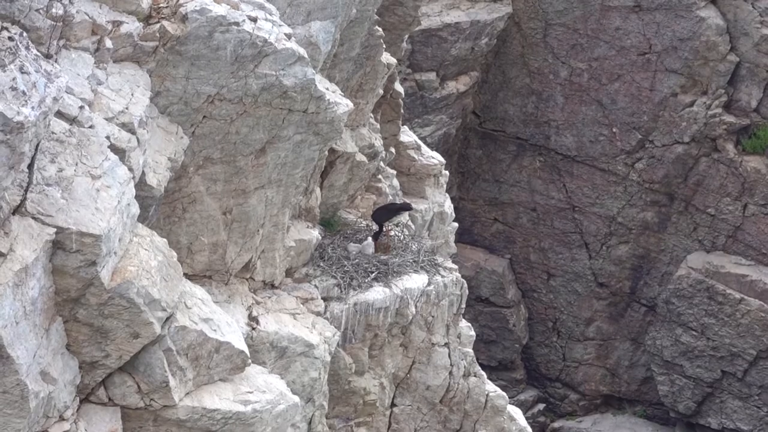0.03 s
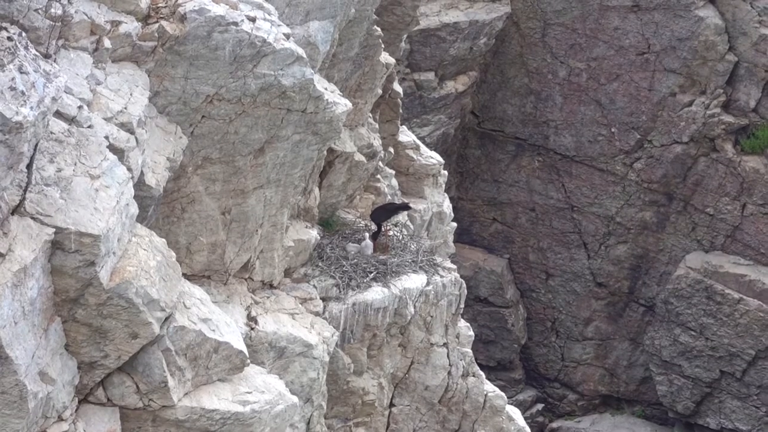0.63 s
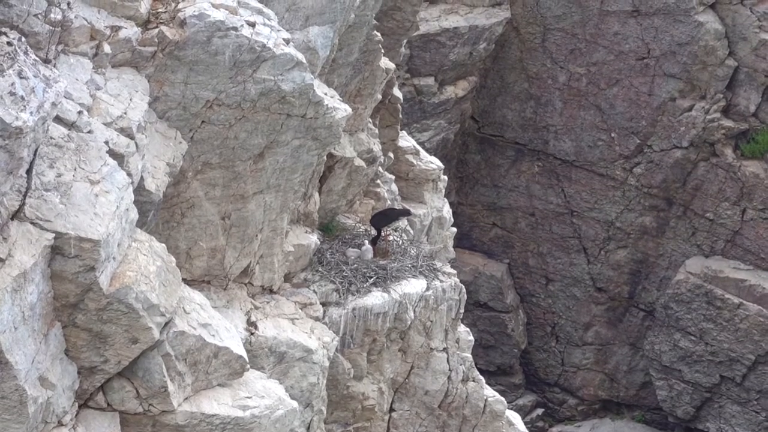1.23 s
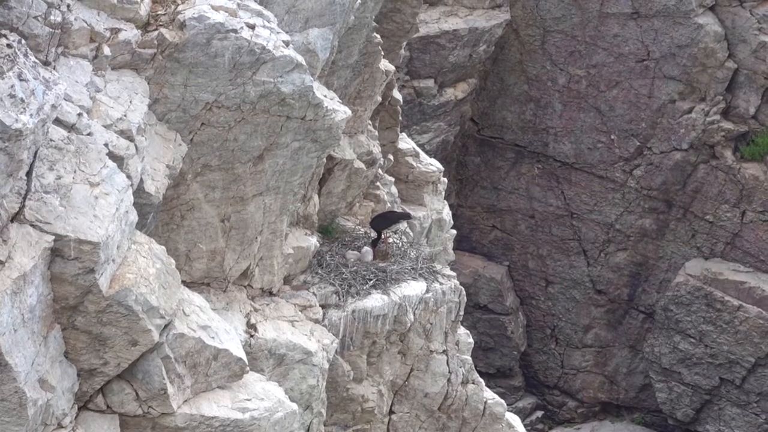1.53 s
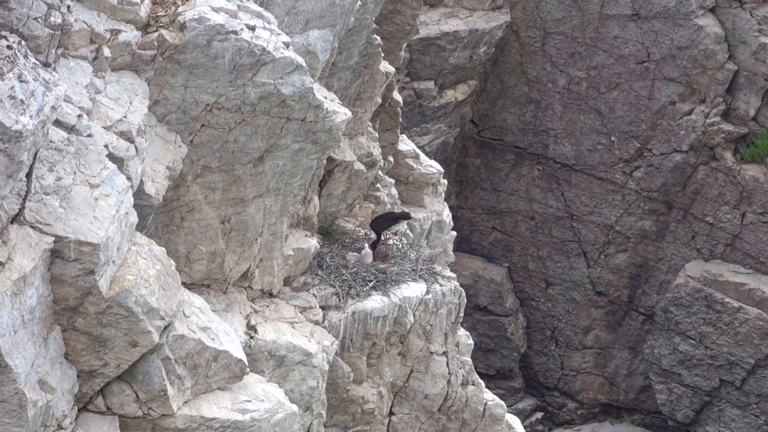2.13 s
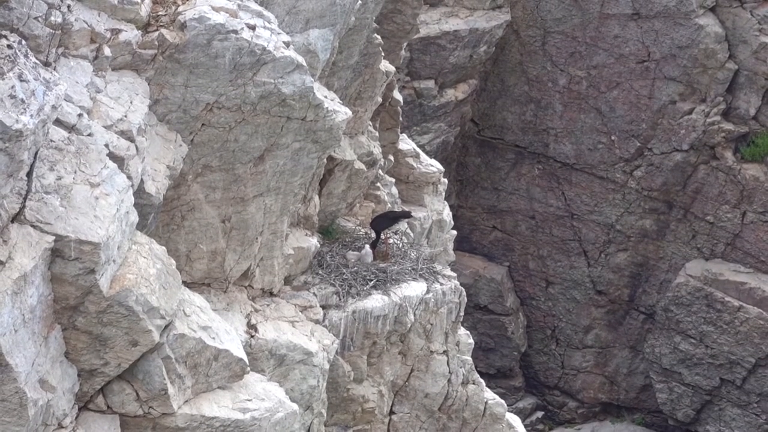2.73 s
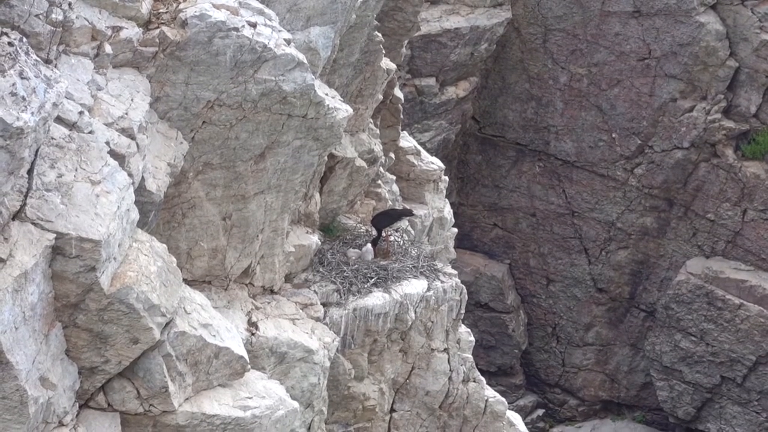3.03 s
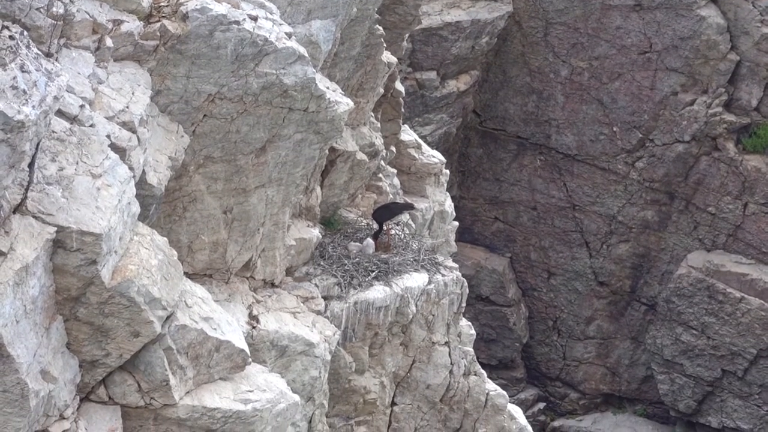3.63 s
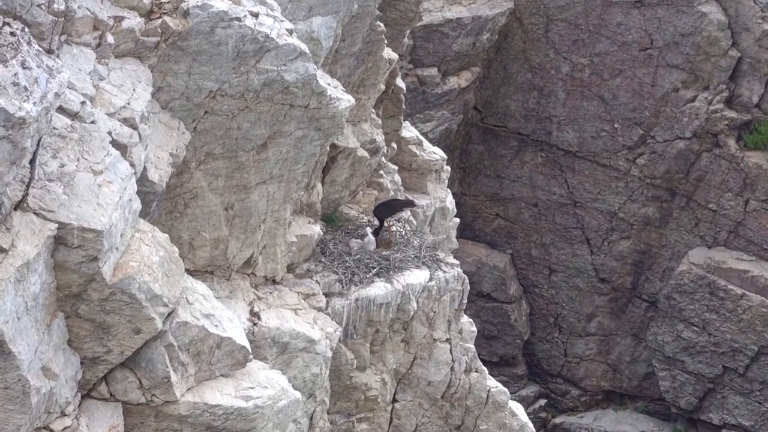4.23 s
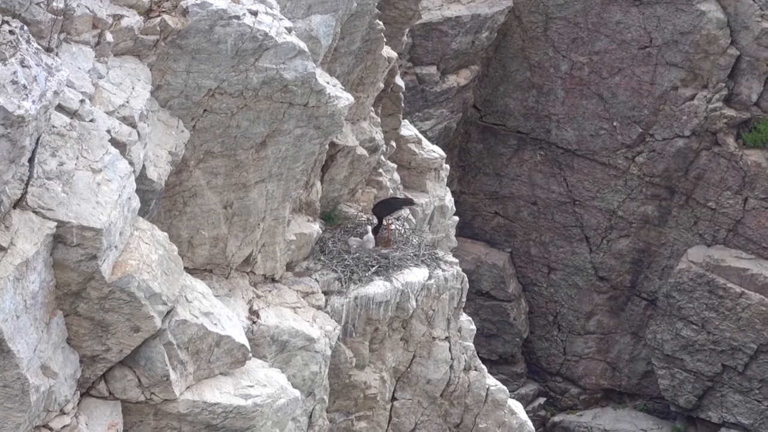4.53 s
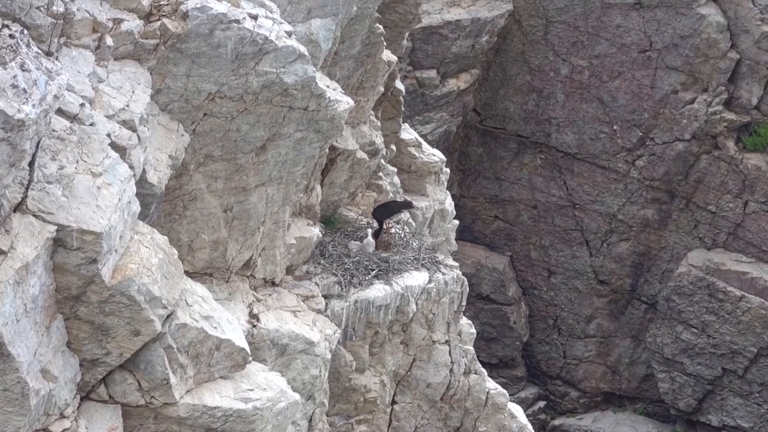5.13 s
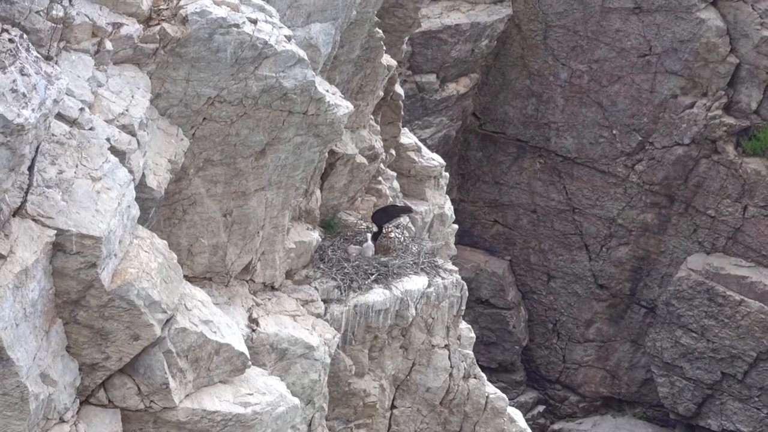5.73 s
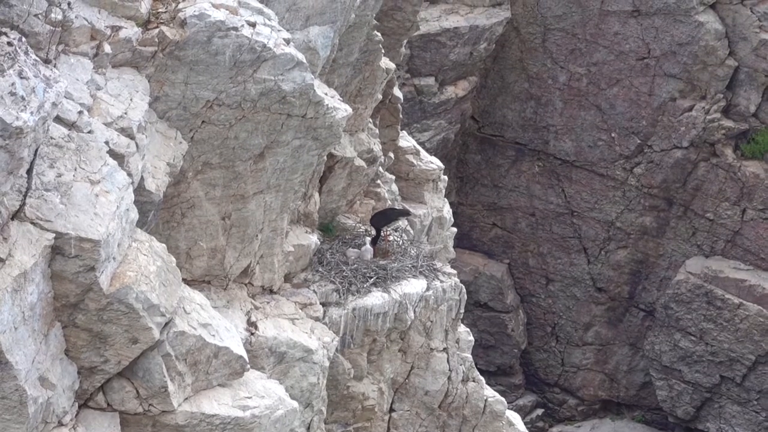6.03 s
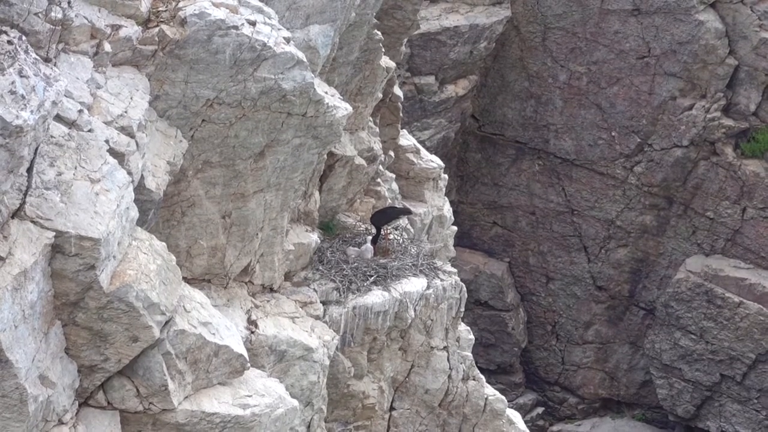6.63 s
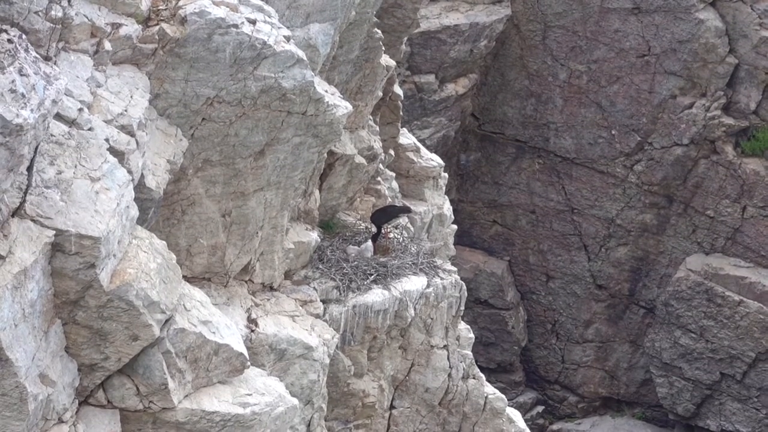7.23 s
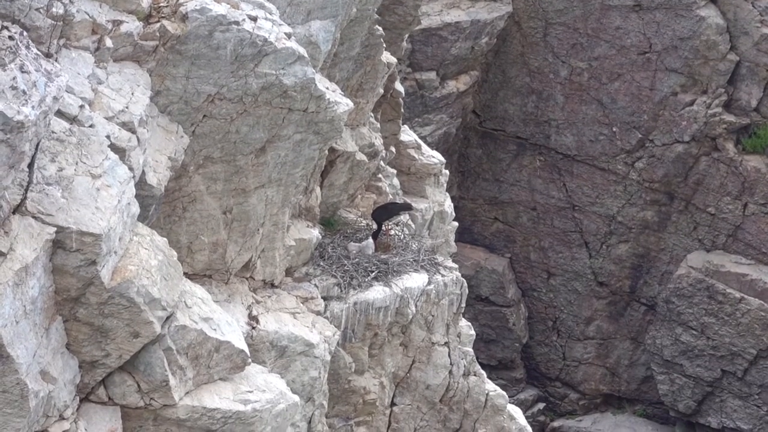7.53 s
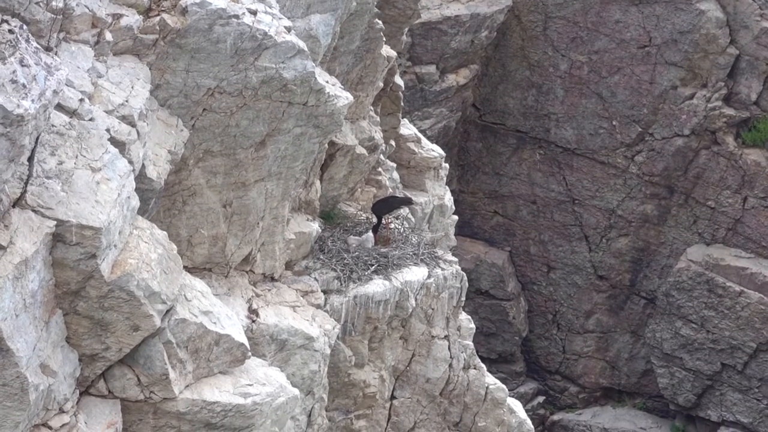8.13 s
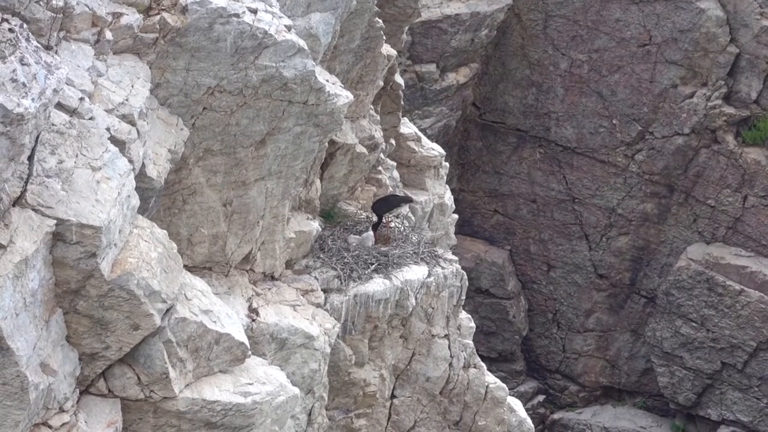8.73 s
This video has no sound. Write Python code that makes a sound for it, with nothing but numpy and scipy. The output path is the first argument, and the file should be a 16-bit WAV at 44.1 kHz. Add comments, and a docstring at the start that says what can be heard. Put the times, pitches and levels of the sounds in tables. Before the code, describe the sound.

Wind gusts rumble and thump on the microphone over distant surf, with faint bird chirps, far seabird cries and one sharp click.

```python
"""Wind on a camera microphone facing a rocky cliff; distant surf washes and hisses throughout.
0-1.3 s: the hardest gusts sweep eddies over both ports, mostly from the right, and drive the limiter.
Weaker gusts follow. Small birds chirp from 0.7 s, far seabirds call from 1.3 s; both echo off the rock.
Faint dry ticks start close by at 1.4 s. A touch rings the camera body at 5.1 s, a small hard part
snaps over with one sharp click at 6.2 s, and a second touch comes at 8.6 s."""
import sys
import numpy as np
from scipy import signal
from scipy.fft import rfft, irfft
from scipy.io import wavfile
from scipy.ndimage import uniform_filter1d, map_coordinates

SR = 44100
rng = np.random.default_rng(int(sys.argv[2]) if len(sys.argv) > 2 else 0)


def dump_mix(stems):
    """Bounce the given channels to the path in sys.argv[1] as a 16-bit WAV at rate SR."""
    frames = np.atleast_2d(stems).T  # one column per channel
    limited = np.clip(frames, -1, 1)  # hard clip at full scale
    pcm = np.round(limited * 32767).astype(np.int16)
    wavfile.write(sys.argv[1], SR, pcm)


N = 396018
T = np.arange(N) / SR

# surf spectra: f/Hz, relative level/dB
WASH_SPECTRUM = [(25, 8), (70, 12), (130, 5.5), (215, 6), (300, 3), (410, 0), (540, 0.5), (750, -3),
                 (920, -2), (1100, -6), (1400, -8.5), (1700, -18.5), (2600, -24.5), (6000, -45)]
SPLASH_SPECTRUM = [(700, -71), (1400, 2.5), (1850, 5), (2400, -1), (3000, -8), (4500, -16), (9000, -22)]
FOAM_SPECTRUM = [(1500, -4), (2800, -1), (4000, 1), (5200, -0.5), (6200, -3), (7500, -5), (8600, -2.5),
                 (9600, -2.5), (11300, -3.5), (13000, -4.5), (15500, -9)]
# surf at the two ports: f/Hz, coherence/1, left minus right/dB
SURF_STEREO = [(60.36, 1, 0.5), (496, 0.88, -1), (1240, 0.59, 1), (2400, 0.27, -4.5), (4100, 0.3, -9),
               (7200, 0.12, -5), (11100, 0.72, 0.5), (15000, 0.8, -3)]
# ebbing wash and foam: t/s, relative level/dB
WASH_ENVELOPE = [(0, -54.5), (.55, -54.5), (1.3, -57.5), (2.5, -57.5), (2.66, -54.5), (2.9, -57),
                 (3.8, -59), (5.5, -58.5), (6.2, -60), (7.5, -58.5), (8.1, -62), (8.7, -59.5),
                 (8.98, -60.5)]
FOAM_ENVELOPE = [(0, -56.5), (.55, -55), (1, -61.5), (1.7, -60.5), (3, -61.5), (4.3, -66), (6.5, -67.5),
                 (8.98, -69.5)]
# waves breaking on rock: t/s, hold/s, level/dB
BREAKING_WAVES = [(0, 1.52, -60), (1.7, 1.74, -63.5), (2.634, 0.088, -56), (3.351, 0.16, -63.5),
                  (5.4, 0.552, -65.5), (6.5, 1.11, -62.5), (8.679, 0.13, -65.5)]
# hollow rushes in the surf: t/s, hold/s, centre f/Hz, level/dB
HOLLOW_RUSHES = [(0, 3.34, 1145, -60), (.6, 2.2, 1908, -71.5), (5.2, 0.67, 1860, -67)]
WAVE_RISE_DB_PER_S = 54

# bird notes: t/s, length/s, start f/Hz, middle f/Hz, end f/Hz, relative level/dB, waver/Hz
SMALL_BIRD_CHIRPS = [ (.735, 0.072, 9100, 8350, 7050, -54, 170), (2.02, 0.078, 8920, 8085, 7046, -58, 130),
                     (5.265, 0.077, 8730, 7997, 7020, -67, 170.6),
                     (6.088, 0.055, 3194, 4020, 4570, -61, 45.1),
                     (6.368, 0.098, 4780, 4000, 3170, -58.5, 30.4),
                     (7.875, 0.078, 8870, 8235, 7320, -68, 170.9), ]
SEABIRD_CRIES = [ (1.31, 0.11, 1997, 2032, 1913, -61, 90.2), (3.32, 0.16, 2808, 2383, 1909, -62, 109.5),
                 (3.48, 0.13, 2143, 2286, 2184, -64, 90), (5.76, 0.053, 1803, 1732, 1671, -62, 30.1),
                 (5.79, 0.11, 1888, 2030, 1932, -64, 110.1), (7.31, .29, 2458, 2528, 2306, -64, 45),
                 (7.7, .12, 2147, 2330, 2464, -64, 90.24), (8.0, 0.2, 2218, 2537, 2494, -67.5, 65),
                 (8.275, 0.066, 947, 1040, 1028, -59, 69.9), (8.65, 0.11, 2450, 2540, 2314, -63.5, 100.2),
                 (8.7, 0.14, 2250, 2080, 1897, -59.5, 110.9), (8.745, 0.05, 850, 887, 901.5, -51, 90), ]

# dry ticks: t/s, level/dB
RUSTLE_TICKS = [(1.438, -58), (1.457, -56), (1.769, -56), (1.799, -58), (1.998, -59.5), (2.921, -60),
                (5.122, -63), (8.618, -61)]
# tick spectrum: f/Hz, relative level/dB
TICK_SPECTRUM = [(1500, -27), (3400, 4), (4200, -9), (5800, -1), (9000, -25)]
# touches on the camera body: t/s, relative level/dB
BODY_TOUCHES = [(5.121, -46.5), (8.586, -44)]
# body modes: f/Hz, relative level/dB, t60/s
BODY_MODES = [(570, 3, .025), (820, -5, .02), (1150, -10, .015)]
# contacts of the clicking part: t/s, relative level/dB
PART_CONTACTS = [(6.1809, -18.5), (6.1825, -25), (6.1827, -23.5)]
# its modes: f/Hz, relative level/dB, t60/s, left minus right/dB
PART_MODES = [(931, -23.5, 0.082, 5), (1218, -24, 0.013, 0), (1575, -18, 0.019, -8), (2046, -23, 0.03, -1),
              (2420, -14, 0.016, -2), (3024, -11.5, 0.0081, -7), (4400, -11.5, 0.0046, -4),
              (5710, -7.5, 0.0026, -14), (8740, -4.5, 0.0048, 0), (10230, -18, 0.005, 0),
              (11300, -12, 0.007, 1)]

# light air between gusts: t/s, level/dB
BREEZE_ENVELOPE = [(0, -45), (1.7, -46), (3.3, -46), (3.8, -52), (4.7, -46), (6.6, -58), (7.3, -51.5),
                   (8.98, -54)]
# gusts: t/s, hold/s, level/dB, left port lag/s (positive: from the right)
WIND_GUSTS = [(0, 0.053, -22, .0011), (0.099, 0.13, -32, .001), (0.421, 0.068, -22.5, .0011),
              (0.543, 0.07, -27, .001), (0.611, 0.28, -20, .0006), (0.936, 0.24, -23, .0007),
              (1.183, 0.071, -25, .001), (1.488, 0.089, -40, .001), (1.701, 0.12, -42, 0),
              (1.95, 0.044, -27.5, .0004), (2.02, 0.064, -33.5, -.0009), (2.363, 0.068, -27, .0008),
              (2.452, 0.087, -35, -.0002), (2.657, 0.18, -39, 0), (2.967, 0.04515, -27, .0009),
              (3.059, 0.043, -32, -.0007), (3.181, 0.085, -38.5, .0007), (3.346, 0.087, -23.5, -.0007),
              (3.51, 0.023, -30, -.0011), (3.613, 0.13, -43, 0), (3.981, .02, -35, .0008),
              (4.18, 0.23, -36, -.0003), (4.416, 0.16, -32.5, -.0008), (4.661, .17, -34.5, -.0003),
              (4.982, 0.082, -33, -.0008), (5.217, 0.033, -27, .001), (5.335, 0.024, -38, -.0002),
              (5.478, .025, -37, -.0002), (5.696, 0.21, -43.5, 0), (6.83, 0.023, -43, 0),
              (6.995, 0.0401, -27.5, .0008), (7.08, 0.08, -31, .001), (7.563, 0.052, -42, 0),
              (7.966, 0.12, -37.5, .0007), (8.649, 0.091, -34.5, .0009)]
# strongest eddies, slapping the ports: t/s, relative level/dB, core speed/air speed
EDDY_SLAPS = [(.008, -17, 0.96), (0.052, -16, 0.81), (0.189, -24, 1.48), (0.426, -16, 1.05),
              (.567, -21, 1.024), (0.59, -15.5, 0.92), (.619, -10.5, 1.58), (0.654, -13.5, 1.204),
              (0.668, -10.5, 1.33), (.692, -17, 1.76), (.707, -16.5, 1.63), (0.729, -10.5, 1.124),
              (0.767, -18.5, 1), (0.796, -23, 1.21), (0.82, -10, 1.196), (.838, -13.5, 1.3),
              (0.859, -15, 1.21), (.951, -9.5, 1.204), (.968, -13, 1.25), (1.017, -14, 1.24),
              (1.054, -17.5, 1.026), (1.108, -18, 1.1), (1.13, -14, 1.55), (1.157, -13.5, 1.31),
              (1.19, -19, 0.83), (1.22, -21, 1.2), (1.496, -29.5, 1.05), (1.957, -21, 1.07),
              (1.993, -19.5, 0.66), (2.348, -21.5, 1.4), (2.398, -25.5, 1.22), (2.421, -21.5, 1.3),
              (2.986, -24, 1.1), (3.357, -16.5, .82), (3.4, -17.5, 0.85), (3.434, -16.5, 0.79),
              (3.519, -22.5, 1.12), (4.197, -30, 1.23), (4.508, -23, 1.31), (4.812, -29, 1.16),
              (5.054, -25.5, 1.08), (5.232, -17.5, 0.73), (5.242, -17.5, 1.53), (6.988, -26.5, 1.17),
              (7.004, -19, 1.215), (7.021, -26, 1.22), (7.09, -26, 1.09), (7.99, -32, 1.25),
              (8.055, -30.5, 0.82), (8.655, -30, 0.85), (8.725, -30, 0.83)]
# eddy pressure spectrum at GUST_REF_DB: f/Hz, relative level/dB
EDDY_SPECTRUM = [(12, -33), (25, -8.5), (50, 1.5), (90, 4.5), (160, 0.5), (300, -10), (430, -22.5),
                 (620, -31), (900, -55), (1500, -68), (4000, -102)]
# air tearing off the ports: f/Hz, relative level/dB
RASP_SPECTRUM = [(200, -20), (400, 4.5), (620, 3.5), (900, -7.5), (1300, -23), (3500, -37.5)]
GUST_REF_DB, SPEED_EXPONENT = -19, .31  # air speed ~ strength ** SPEED_EXPONENT


def undb(db):
    """Decibels to gain."""
    return 10 ** (np.asarray(db) / 20)


def per_sample(table):
    """A (t/s, value) table, interpolated per sample."""
    return np.interp(T, *np.transpose(table))


def per_bin(table, size):
    """Table columns per FFT bin, interpolated over log frequency."""
    hz, *columns = np.transpose(table)
    bins_hz = np.maximum(np.fft.rfftfreq(size, 1 / SR), 1)
    return [np.interp(np.log(bins_hz), np.log(hz), c) for c in columns]


def noise(spectrum, size=N):
    """Coloured noise, rms 1."""
    x = irfft(rfft(rng.standard_normal(size)) * undb(per_bin(spectrum, size)[0]), size)
    return x / x.std()


def walk(rate_hz):
    """Smooth random curve, spread near 1."""
    return map_coordinates(rng.standard_normal(4096), [T * rate_hz], order=3, mode="wrap")


def pan(db):
    """Port gains for a left-minus-right level."""
    return undb(np.array([[1], [-1]]) * db / 2)


def add(out, at_s, x):
    """Mix x into out."""
    i = int(at_s * SR)
    out[..., i:i + x.shape[-1]] += x[..., :N - i]


def decay(t, t60_s):
    """Exponential fall, 60 dB per t60_s."""
    return np.exp(-np.log(1000) * t / t60_s)


def swell_db(at_s, hold_s, top_db, rise_db_per_s, fall_db_per_s):
    """Level that rises until at_s, holds, then falls."""
    before_s, after_s = np.maximum(at_s - T, 0), np.maximum(T - at_s - hold_s, 0)
    return top_db - rise_db_per_s * before_s - fall_db_per_s * after_s


def far_noise(spectrum, flicker_db, flicker_hz, lag_s):
    """Flickering distant noise: coherent in the bass, diffuse and to the right in the treble."""
    coherence, tilt_db = per_bin(SURF_STEREO, N)
    mid, side = rfft(noise(spectrum)), rfft(noise(spectrum))
    pair = mid * np.sqrt(1 + coherence) + np.array([[1], [-1]]) * side * np.sqrt(1 - coherence)
    left_delay = np.exp(-2j * np.pi * np.fft.rfftfreq(N, 1 / SR) * np.array([[lag_s], [0]]))
    return irfft(pair * left_delay * pan(tilt_db), N) * undb(flicker_db * walk(flicker_hz)) / np.sqrt(2)


def surf(wash_gain_db=10.5, foam_gain_db=2, lapping_db=-70.5, fall_db_per_s=35):
    """Water washes on rock, splashes where it breaks and leaves hissing foam."""
    wash = far_noise(WASH_SPECTRUM, flicker_db=1, flicker_hz=14, lag_s=-45e-6)
    splash = far_noise(SPLASH_SPECTRUM, flicker_db=1.96, flicker_hz=25, lag_s=-16e-6)
    foam = far_noise(FOAM_SPECTRUM, flicker_db=1, flicker_hz=26, lag_s=80e-6)
    wash_db = per_sample(WASH_ENVELOPE) + wash_gain_db
    foam_db = per_sample(FOAM_ENVELOPE) + foam_gain_db
    splash_db = lapping_db
    for at_s, hold_s, db in BREAKING_WAVES:
        splash_db = np.maximum(splash_db, swell_db(at_s, hold_s, db, WAVE_RISE_DB_PER_S, fall_db_per_s))
    return undb(wash_db) * wash + undb(splash_db) * splash + undb(foam_db) * foam


def hollow_waves(width_hz=270, drift_hz=25, fall_db_per_s=19, pan_db=-1):
    """Some waves rush hollowly: noise in one broad, drifting resonance."""
    out = np.zeros((2, N))
    lowpass = signal.butter(2, width_hz / 2, fs=SR, output="sos")
    for at_s, hold_s, centre_hz, db in HOLLOW_RUSHES:
        rush = signal.sosfilt(lowpass, rng.standard_normal((3, N)) + 1j * rng.standard_normal((3, N)))
        carrier = np.exp(2j * np.pi * np.cumsum(centre_hz + drift_hz * walk(3)) / SR)
        pair = np.real((rush[:2] + rush[2]) * carrier)  # row 2 is common to both ports
        out += pair / pair.std() * undb(swell_db(at_s, hold_s, db, WAVE_RISE_DB_PER_S, fall_db_per_s))
    return out * pan(pan_db)


def whistles(notes, waver_rate_hz, flutter_db=3.5):
    """One tone per note: swells, bends through three pitches, wavers in pitch and level."""
    out, waver = np.zeros(N), walk(waver_rate_hz)
    for at_s, length_s, start_hz, middle_hz, end_hz, db, waver_hz in notes:
        progress = np.linspace(0, 1, int(length_s * SR))
        bend_hz = np.polyval(np.polyfit([0, .5, 1], [start_hz, middle_hz, end_hz], 2), progress)
        hz = bend_hz + waver_hz * np.roll(waver, -int(at_s * SR))[:len(progress)]
        envelope = undb(db) * np.sqrt(2 * np.abs(np.sin(np.pi * progress)))
        add(out, at_s, envelope * np.sin(2 * np.pi * np.cumsum(hz) / SR))
    return out * undb(flutter_db * walk(waver_rate_hz / 2))


def cliff(x, direct_db, echo_db, t60_s, pan_db, build_s=.018):
    """Broken rock scatters a sound into a short diffuse tail."""
    t = T[:SR]
    tail = rng.standard_normal((2, SR)) * decay(t, t60_s) * (1 - np.exp(-t / build_s))
    tail /= np.sqrt(np.sum(tail ** 2, axis=1, keepdims=True))
    echo = signal.fftconvolve(x[None], tail, axes=1)[:, :N]
    return (undb(direct_db) * x + undb(echo_db) * echo) * pan(pan_db)


def birds():
    """Chirps from high on the rock; far, hoarse cries with a longer tail."""
    chirps = whistles(SMALL_BIRD_CHIRPS, waver_rate_hz=310)
    cries = whistles(SEABIRD_CRIES, waver_rate_hz=220)
    return (cliff(chirps, direct_db=-9, echo_db=-12, t60_s=.48, pan_db=1)
            + cliff(cries, direct_db=-5, echo_db=-9, t60_s=.97, pan_db=2.5))


def rustle(fade_s=.0097, pan_db=-4):
    """Something dry ticks: short bursts of bright noise."""
    envelope = np.zeros(N)
    for at_s, db in RUSTLE_TICKS:
        add(envelope, at_s, undb(db) * np.exp(-T[:SR // 10] / fade_s))
    return envelope * noise(TICK_SPECTRUM) * pan(pan_db)


def knocks():
    """Light touches ring the camera body's damped modes."""
    t, out = T[:SR // 10], np.zeros(N)
    ring = sum(undb(db) * decay(t, t60_s) * np.sin(2 * np.pi * hz * t) for hz, db, t60_s in BODY_MODES)
    for at_s, db in BODY_TOUCHES:
        add(out, at_s, undb(db) * ring)
    return out


def click(crack_db=-6, crack_pan_db=-5, crack_band_hz=(1100, 11500), crack_s=.001, lag_s=80e-6):
    """A small hard part snaps over: three contacts in 2 ms, each a crack and a brief ring."""
    t, out = T[:SR // 20], np.zeros((2, N))
    age_s = np.maximum(t - np.array([[lag_s], [0]]), 0)
    ring = 0
    for k, (hz, db, t60_s, pan_db) in enumerate(PART_MODES):
        mode = decay(age_s, t60_s) * np.sin(2 * np.pi * hz * age_s)
        ring += (-1) ** k * undb(db) * pan(pan_db) * mode
    bandpass = signal.butter(2, crack_band_hz, "band", fs=SR, output="sos")
    for at_s, db in PART_CONTACTS:
        crack = signal.sosfilt(bandpass, rng.standard_normal((2, len(t))) * np.exp(-t / crack_s))
        add(out, at_s, undb(db) * (ring + undb(crack_db) * pan(crack_pan_db) * crack))
    return out


def air_stream(rise_db_per_s=649.5, fall_db_per_s=380.5, veer_s=.013, swirl_s=.00039,
               puff_db=3, flutter_db=1.75):
    """Stream strength and port lag/s; the strongest gust of the moment sets both."""
    air_db = per_sample(BREEZE_ENVELOPE) + puff_db * walk(15)
    lag_s = np.zeros(N)
    for at_s, hold_s, db, crossing_s in WIND_GUSTS:
        gust_db = swell_db(at_s, hold_s, db, rise_db_per_s, fall_db_per_s)
        lag_s = np.where(gust_db > air_db, crossing_s, lag_s)
        air_db = np.maximum(air_db, gust_db)
    lag_s = uniform_filter1d(lag_s, int(veer_s * SR)) + swirl_s * walk(28)
    return undb(air_db + flutter_db * walk(40)), lag_s


def eddy_slaps(slap_width_s=.0105, slap_gain_db=-1, core_width_s=.0015, core_gain_db=.5):
    """Strong eddies swell, with a suction pulse at the core. Fast cores crack, slow ones thump."""
    slaps, suction, speedup = np.zeros(N), np.zeros(N), np.ones(N)
    for at_s, db, core_speed in EDDY_SLAPS:
        near = slice(max(int((at_s - 4 * slap_width_s) * SR), 0), int((at_s + 4 * slap_width_s) * SR))
        offset_s = (T[near] - at_s) * core_speed
        swell = np.exp(-.5 * (offset_s / slap_width_s) ** 2)
        slaps[near] = np.maximum(slaps[near], undb(db + slap_gain_db) * swell)
        speedup[near] *= core_speed ** np.sqrt(swell)
        radii = offset_s * undb(db - GUST_REF_DB) ** SPEED_EXPONENT / core_width_s
        suction[near] += undb(db + core_gain_db) * (radii ** 2 - 1) * np.exp(-.5 * radii ** 2)
    return slaps, suction, speedup


def eddy_pattern(size=2 ** 19, window_s=.029):
    """Frozen pressure pattern, levelled: neighbouring eddies carry similar energy."""
    eddies, window = noise(EDDY_SPECTRUM, size), int(window_s * SR)
    power = uniform_filter1d(uniform_filter1d(eddies ** 2, window), window)
    return eddies / np.sqrt(power + 1e-9)


def wind(jerk_db=1.34, jerk_rate_hz=170, rasp_db=-52, port_turbulence_db=-12):
    """Eddies pass the ports in jerks: faster air is louder and higher; hard slaps rasp."""
    stream, lag_s = air_stream()
    jerks = undb(jerk_db * np.tanh(walk(jerk_rate_hz)))
    slaps, suction, speedup = eddy_slaps()
    surge = jerks * speedup
    lag_s /= speedup  # fast cores cross the ports sooner
    strength = np.maximum(stream, slaps)
    travel = np.cumsum(surge * (strength / undb(GUST_REF_DB)) ** SPEED_EXPONENT)
    eddies = eddy_pattern()
    rasp = undb(rasp_db) * (slaps * surge / undb(GUST_REF_DB)) ** 2 * noise(RASP_SPECTRUM)
    ports = []
    for port_t in (T - lag_s / 2, T + lag_s / 2):
        pressure = eddies + undb(port_turbulence_db) * noise(EDDY_SPECTRUM, len(eddies))
        passing = map_coordinates(pressure, [np.interp(port_t, T, travel)], order=1, mode="wrap")
        ports.append(passing * strength + np.interp(port_t, T, suction + rasp))
    return np.array(ports)


def scene():
    """Wind on the ports over the shore and small close sounds."""
    return wind() + surf() + hollow_waves() + birds() + click() + rustle() + knocks()


def limiter(x, ceiling_db=-9, release_db_per_s=70):
    """Peaks over the ceiling cut the gain at once; it creeps back."""
    over_db = np.maximum(20 * np.log10(np.abs(x).max(axis=0) + 1e-9) - ceiling_db, 0)
    recovery_db = release_db_per_s * T
    cut_db = np.maximum.accumulate(over_db + recovery_db) - recovery_db
    return x * undb(-uniform_filter1d(cut_db, size=96))


def record(dry):
    """Camera chain: 5 ms fade-in, limiter, steep 15.85 kHz low-pass."""
    fade_in = np.minimum(T / .005, 1)
    lowpass = signal.ellip(10, .2, 80, 15850, fs=SR, output="sos")
    return signal.sosfilt(lowpass, limiter(dry * fade_in))


dry = scene()
out = record(dry)
dump_mix(out)
```